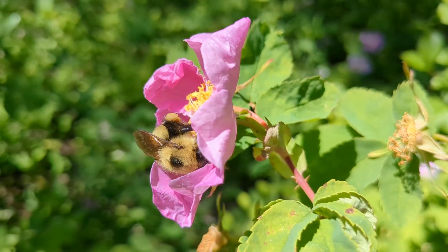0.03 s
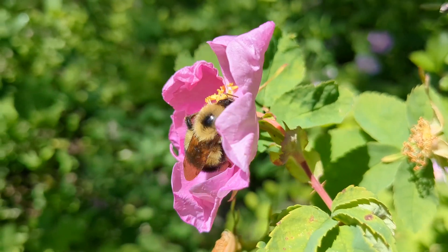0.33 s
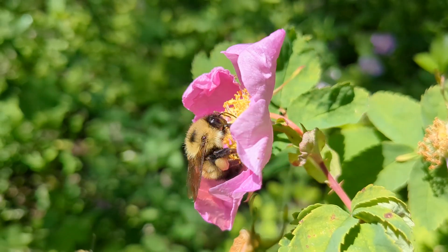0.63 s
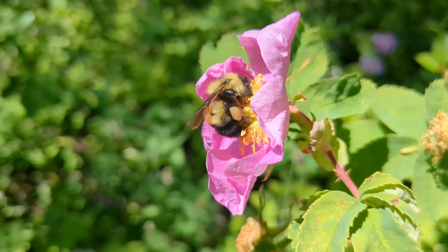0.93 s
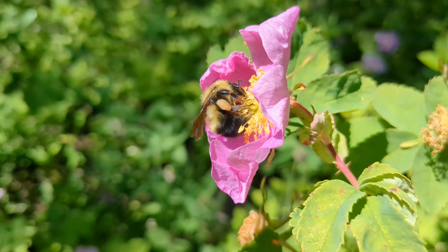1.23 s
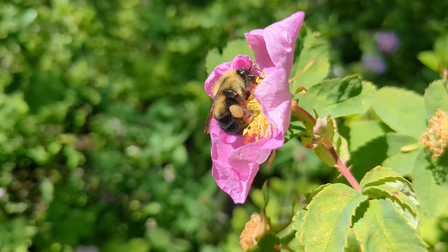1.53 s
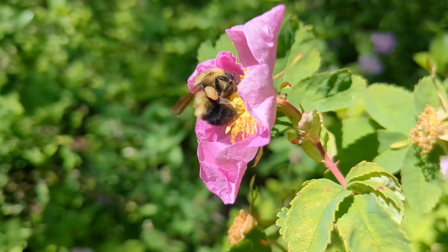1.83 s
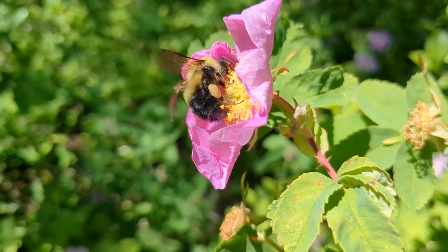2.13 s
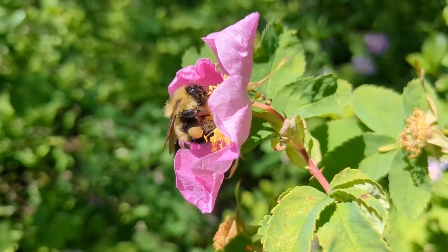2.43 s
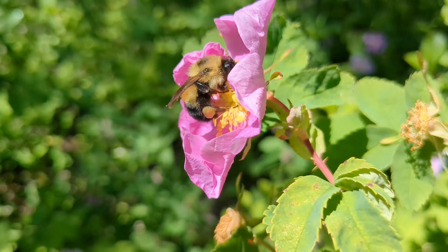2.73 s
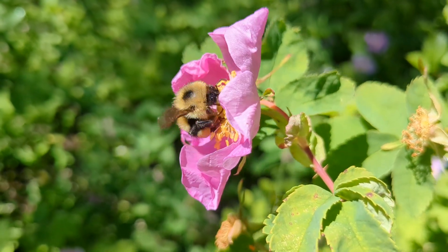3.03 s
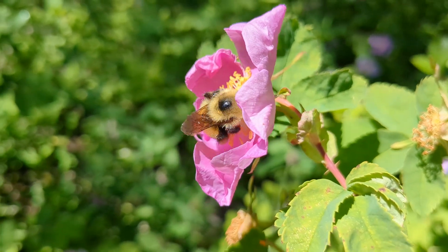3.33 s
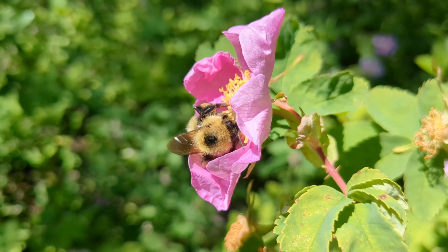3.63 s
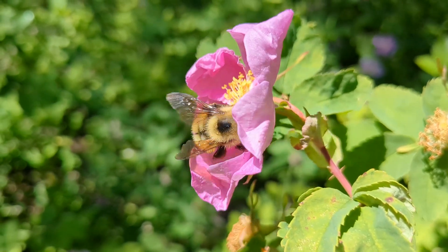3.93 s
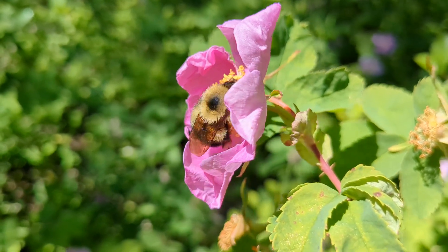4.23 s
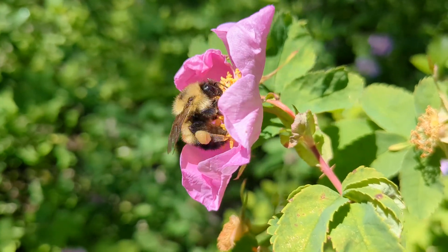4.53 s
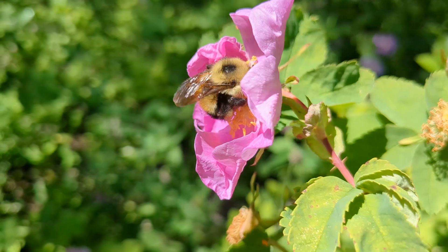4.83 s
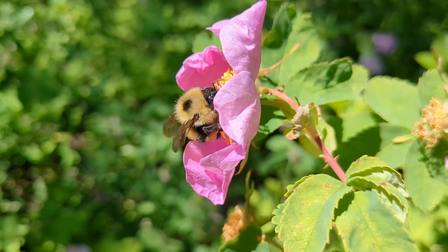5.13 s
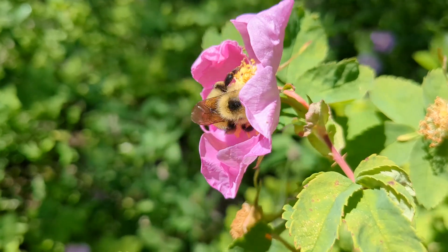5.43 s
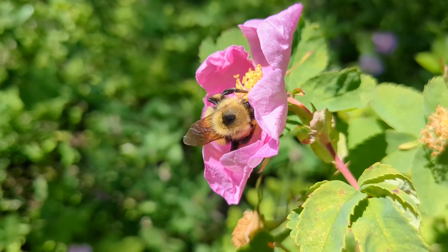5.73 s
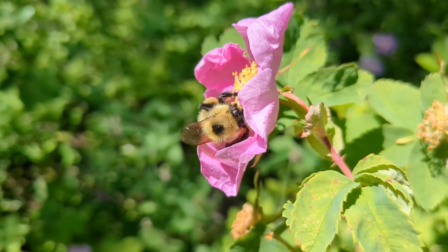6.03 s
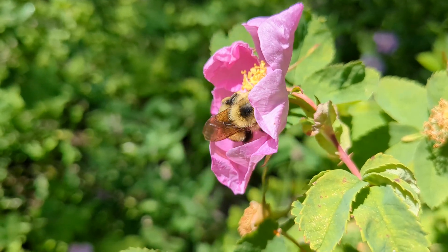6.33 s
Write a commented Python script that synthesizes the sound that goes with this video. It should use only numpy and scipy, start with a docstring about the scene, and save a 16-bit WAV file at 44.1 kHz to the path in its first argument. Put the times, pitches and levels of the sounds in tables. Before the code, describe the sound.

Close to the microphone, a bumblebee shakes pollen from a flower in repeated bursts of thin, sizzling buzz, the pitch jumping up and sagging. Its wings and legs flick the petals with tiny ticks and now and then a brief lower whirr. During the first half a smaller bee hovers from left to right and another hums farther off. Then the bumblebee carries on over faint garden air.

```python
"""A close, sizzling buzz comes first, in bursts: a bumblebee shakes pollen from a wild rose, its thorax
driving stamens and petals into forced vibration, one stroke a cycle. A second, smaller bee hovers from
left to right for three seconds and a third hums farther off in the quiet garden; both radiate harmonics
of their wingbeats. Wings and legs flick and tap the petals, and now and then the bumblebee's wings open
and whirr lower."""
import sys
import numpy as np
from scipy import signal
from scipy.fft import rfft, irfft, next_fast_len
from scipy.io import wavfile
from scipy.ndimage import uniform_filter1d, map_coordinates

SR = 44100
rng = np.random.default_rng(int(sys.argv[2]) if len(sys.argv) > 2 else 0)


def generate_wav(sig):
    """Save sig (samples, or channels by samples) to the path in sys.argv[1] as 16-bit PCM at SR."""
    pcm = np.round(np.clip(np.atleast_2d(sig).T, -1, 1) * 32767).astype(np.int16)
    wavfile.write(sys.argv[1], SR, pcm)


N = 280917
TIME = np.arange(N) / SR

# Bursts of shaking: start t/s, end t/s, rise/s, fall/s, then relative level/dB of
# sizzle, rasp, drone, upper stamen modes, petal rim modes, petal blade modes
SHAKE_BURSTS = [(-.05, 0.151, .03, 0.16, -47, -53, -56, 6, -3, -18),
                (0.094, 0.202, 0.068, 0.028, -32, -46, -43, 11, -8, -19),
                (.17, 0.517, .03, 0.25, -49, -57, -54.5, 7, -2, -16),
                (.41, 0.757, 0.09, .18, -41.5, -50.5, -44, 4.5, -3.5, -19),
                (0.675, 0.889, 0.039, 0.095, -37.5, -48.5, -33, 6.5, -6, -2),
                (0.849, 1.44, 0.14, 0.16, -43, -48.5, -51.5, -1, -11, -2),
                (1.427, 1.523, 0.025, 0.06, -59, -59, -44.5, 3, -3, -4),
                (1.659, 2.162, 0.12, 0.15, -40.5, -48, -49.5, 2, -11, -2.5),
                (2.088, 2.229, 0.043, 0.1, -35.5, -47.5, -50, 10, -7, -10),
                (2.197, 2.35, 0.03, 0.031, -51.5, -53.5, -49, 4, -6, -15),
                (2.338, 2.597, 0.019, 0.11, -42, -49, -51.5, 6, -6, -4),
                (2.756, 3.159, 0.16, 0.14, -39, -47.5, -50.5, 9, -14, -11),
                (3.385, 3.784, 0.039, 0.054, -34, -48.5, -50.5, 10, -6.5, 4.5),
                (3.679, 3.768, 0.024, .06, -30, -48, -66, 9, -5, -1.5),
                (3.749, 3.948, 0.023, 0.13, -39, -50.5, -56, 8, -8, -19),
                (3.912, 4.019, .06, 0.031, -40.5, -55, -75, 13, -15, -12),
                (4.065, 4.265, 0.013, 0.19, -48, -61, -82, 3, -9, 4),
                (4.211, 4.669, 0.18, 0.18, -37.5, -50.5, -54.5, 11.5, -1, -9),
                (4.758, 5.195, 0.1, 0.052, -35.5, -49.5, -51, 16.5, -8, 0.5),
                (5.21, 5.279, 0.0093, .06, -47.5, -77, -85, 8, -8, -16),
                (5.36, 5.491, .06, 0.042, -47, -60, -66, 3.5, -9, 3),
                (5.493, 6.196, 0.053, .14, -32.5, -49, -49, 9, -4.5, 1)]
# Spectrum of the air pushed by wings: f/Hz, relative level/dB
DRAUGHT_SPECTRUM = [(25, -14.5), (70, 0.5), (130, 1), (300, -5), (700, 0), (2000, -26), (15800, -100)]


def amp(db):
    """Amplitude ratio of a level: a factor of ten for every 20 dB."""
    return 10 ** (np.asarray(db) / 20)


def unit(x):
    """Normalisation to an rms of 1."""
    return x / np.sqrt(np.mean(x ** 2) + 1e-20)


def curves(rows):
    """Linear interpolation: one value per sample for each column after the time."""
    times, *columns = np.transpose(rows)
    return [np.interp(TIME, times, column) for column in columns]


def wobble(rate):
    """Slow random modulation: a spline through `rate` Gaussian knots a second."""
    return map_coordinates(rng.standard_normal(int(N * rate / SR) + 4), [TIME * rate])


def filtered(x, response):
    """Linear filtering: the spectrum of x times a complex frequency response."""
    size = next_fast_len(N + 8192)
    return irfft(rfft(x, size) * response(np.fft.rfftfreq(size, 1 / SR)), size)[..., :N]


def coloured(x, spectrum):
    """Spectral shaping by (f/Hz, level/dB) points on a logarithmic frequency axis."""
    hz, db = np.transpose(spectrum)
    return filtered(x, lambda f: amp(np.interp(np.log(f + 1), np.log(hz), db)))


def ringing(x, modes):
    """Resonance: each mode (f/Hz, width/Hz, level/dB) is a band-pass, squared for steep sides."""
    def band_pass(f, hz, width):
        return 1j * f * width / (hz * hz - f * f + 1j * f * width)
    return filtered(x, lambda f: sum(amp(db) * band_pass(f, hz, width) ** 2 for hz, width, db in modes))


def shifting(x, modes, drift_db):
    """Varying modal coupling: each resonance swells and fades as the bee changes its footing."""
    return unit(sum(amp(db + drift_db * wobble(9)) * unit(ringing(x, [(hz, width, 0)]))
                    for hz, width, db in modes))


def placed(x, balance_db, lead_ms):
    """Localisation by level and time difference: positive values make the left louder and earlier."""
    half = np.array([[.5], [-.5]])
    pair = filtered(x, lambda f: np.exp(2j * np.pi * f * half * lead_ms / 1000))
    gain = amp(half * balance_db)
    return pair * gain / np.sqrt(np.mean(gain ** 2, axis=0))


def impulses(seconds, sizes):
    """Band-limited impulses: windowed sinc pulses, which can fall between samples."""
    at = np.asarray(seconds)[:, None] * SR
    index = np.floor(at).astype(int) + np.arange(-7, 9)
    shape = np.sinc(index - at) * np.cos(np.pi * (index - at) / 16) ** 2
    pulses = np.asarray(sizes)[:, None] * shape
    return np.bincount(np.clip(index, 0, N).ravel(), pulses.ravel(), N + 1)[:N]


def gate(start, end, rise, fall):
    """Trapezoidal envelope: attack, hold and release, between 0 and 1."""
    return np.clip(np.minimum((TIME - start) / rise, (end - TIME) / fall), 0, 1)


def slips(per_second=18, decay_s=.031):
    """Stick-slip of the feet: random jumps that die away, with mean near 0 and rms 1."""
    count = round(per_second * N / SR)
    offset, size = rng.random((count, 2)).T
    jolts = impulses((np.arange(count) + offset) / count * N / SR, size)
    level = signal.lfilter([1], [1, -np.exp(-1 / (decay_s * SR))], jolts)
    return unit(np.tanh(unit(level - level.mean())))


def shaking_levels():
    """Addition of powers: level/dB of sizzle, rasp and drone, as bursts over restless idle scraping."""
    idle_sizzle_db, idle_rasp_db, fidget_db = -63.5, -70, 6.5
    swell_db_per_s, ruffle_db = 8.5, .95
    slip = slips()
    sizzle = amp(idle_sizzle_db + fidget_db * slip) ** 2
    rasp = amp(idle_rasp_db + fidget_db * slip / 2) ** 2
    drone = 1e-12
    for start, end, rise, fall, sizzle_db, rasp_db, drone_db, *_ in SHAKE_BURSTS:
        effort = gate(start, end, rise, fall)
        swell_db = swell_db_per_s * (np.clip(TIME, start, end) - (start + end) / 2)
        bloom_motion = gate(start, end, 2.66 * rise, fall=.099)  # slow to get going, early to let go
        sizzle += (effort * amp(sizzle_db + swell_db)) ** 2
        rasp += (effort * amp(rasp_db)) ** 2
        drone += (effort * bloom_motion * amp(drone_db)) ** 2
    return 10 * np.log10([sizzle, rasp, drone]) + ruffle_db * slip


def thorax_beat():
    """Exponential relaxation: the buzz jumps to each listed pitch, then its f/Hz sags toward rest."""
    # Pitch jumps, up at a twitch of the flight muscle and down when the wings open: t/s, f/Hz
    jumps = [(0, 205.4), (0.171, 239.2), (0.342, 233), (.49, 278.5), (.61, 258.6), (.72, 156.1),
             (.79, 146.4), (.95, 250), (1.1, 248.9), (1.2, 255.5), (1.34, 284.6), (1.71, 265.3),
             (1.84, 246.1), (1.99, 240.8), (2.13, 145.3), (2.36, 306.3), (2.86, 252.5), (2.97, 245.9),
             (3.07, 258), (3.42, 276.5), (3.63, 230.2), (3.735, 149), (3.83, 149.8), (4.279, 209.2),
             (4.39, 248.6), (4.459, 241), (4.559, 246.6), (4.81, 255.6), (4.89, 238.1), (5.015, 237.2),
             (5.155, 244.5), (5.53, 235), (5.624, 223), (5.69, 227), (5.785, 224), (5.875, 226.5),
             (5.99, 213.8), (6.15, 185.4)]
    jump_s, sag_s, rest_hz = .03, .22, 127.5
    times, jump_hz = np.transpose(jumps)
    last = np.maximum(np.searchsorted(times, TIME + jump_s / 2) - 1, 0)
    beat_hz = rest_hz + (jump_hz[last] - rest_hz) * np.exp((times[last] - TIME) / sag_s)
    return uniform_filter1d(beat_hz, round(jump_s * SR))


def contacts(strokes, width_ms, scatter_db, jitter_ms, bounce, rub):
    """Rattling contact force: a short scrape per stroke, loose bounces around it, rubbing between."""
    bounces, bounce_spread_s = 3, .00244
    chance = rng.standard_normal((len(strokes), 2 + 2 * bounces))
    # a stroke can miss by much, but cannot hit much harder than the muscle allows
    size = amp(scatter_db * np.minimum(chance, 1))
    hits = impulses(strokes + jitter_ms * chance[:, 0] / 1000, size[:, 1] ** 2)
    for k in range(2, 2 + 2 * bounces, 2):
        hits += impulses(strokes + bounce_spread_s * chance[:, k], (bounce * size[:, k + 1]) ** 2)
    lag_ms = np.arange(-128, 129) / SR * 1000
    shape = np.exp(-np.abs(lag_ms) / np.where(lag_ms < 0, width_ms / 2, width_ms))
    power = np.abs(signal.fftconvolve(hits, shape, 'same'))
    return np.sqrt(power / power.mean() + rub ** 2)


def stamen_sizzle(strokes, scatter_db, level_db, upper_db):
    """Impact excitation: gritty contacts ring the high modes of the stamens."""
    # Lower and upper stamen modes: f/Hz, width/Hz, relative level/dB
    lower_modes = [(9500, 1030, 0)]
    upper_modes = [(11285, 1180, -8), (11824, 1070, -5.5)]
    force = contacts(strokes, width_ms=.34, scatter_db=scatter_db, jitter_ms=.12, bounce=.4, rub=.27)
    grit = force * rng.choice([-1, 1], N)
    upper = amp(upper_db)
    # neighbouring modes swing in opposite senses, which fills the valley between them
    stamens = unit(ringing(grit, lower_modes)) - upper * unit(ringing(grit, upper_modes))
    stamens /= np.sqrt(1 + upper ** 2)
    return placed(amp(level_db + 1) * stamens, balance_db=24, lead_ms=.035)


def petal_rasp(strokes, scatter_db, level_db):
    """Friction noise: the soft petals smear the scrapes and send a different share to each side."""
    # Spectrum of scraped petals: f/Hz, relative level/dB
    spectrum = [(30, -22), (90, -13), (400, -14.5), (680, -16.5), (1100, -9), (1900, -0.5), (2650, -3.5),
                (3100, 1.5), (4200, 0), (5200, 1.5), (7000, 0), (8500, -0.5), (12000, -1.5), (15800, -5.5)]
    force = contacts(strokes, width_ms=.6, scatter_db=scatter_db, jitter_ms=.18, bounce=.5, rub=.7)
    scrape = force * (rng.standard_normal(N) + 1.97 * rng.standard_normal((2, N)))
    return placed(amp(level_db + 6) * unit(coloured(scrape, spectrum)), balance_db=1, lead_ms=.2)


def petal_twang(push, level_db, rim_db, blade_db):
    """Periodic excitation: cleanly repeated pushes ring the rim and blade of the petals."""
    # Petal modes: f/Hz, width/Hz, relative level/dB
    rim_modes = [(2106, 440, -2), (3375, 470, 4)]
    blade_modes = [(4960, 460, -0.041), (5361, 670, -0.4), (5945, 500, -1.5)]
    rim = amp(rim_db) * shifting(push, rim_modes, drift_db=.5)
    blade = amp(blade_db) * shifting(push, blade_modes, drift_db=5)
    return placed(amp(level_db - 4.5) * (rim + blade), balance_db=-9.5, lead_ms=.025)


def bloom_drone(push, level_db, beat_hz):
    """Radiation from a small body: the whole bloom drones, too small to give off its lowest harmonics."""
    # Radiation efficiency: f/Hz, relative level/dB
    radiation = [(500, -53), (740, -14), (860, -7), (15800, -6)]
    # Modes of the whole bloom: f/Hz, width/Hz, relative level/dB
    modes = [(1066, 830, 6.5), (1077, 584, -3.5), (1240, 580, -2.5), (2060, 620, -0.5)]
    firm_hz, slack_db_per_hz = 225.3, .25  # below a firm beat the push weakens
    slack_db = slack_db_per_hz * np.maximum(firm_hz - beat_hz, 0)
    bloom = shifting(coloured(push, radiation), modes, drift_db=1.2)
    return placed(amp(level_db - slack_db) * bloom, balance_db=5, lead_ms=.16)


def sonication():
    """Forced vibration: each thorax stroke rattles the stamens, scrapes petals and pushes the bloom."""
    sizzle_db, rasp_db, drone_db = shaking_levels()
    # the mode levels glide from the middle of one burst to the next
    mode_levels = [((start + end) / 2, *rest[-3:]) for start, end, *rest in SHAKE_BURSTS]
    upper_db, rim_db, blade_db = curves(mode_levels)
    beat_hz = thorax_beat()
    cycles = np.cumsum(beat_hz * (1 + .008 * wobble(60))) / SR
    strokes = np.interp(np.arange(1, int(cycles[-1])), cycles, TIME)  # t/s of each whole cycle
    # a loose grip rattles unevenly, a firm one evenly
    grip_db = np.interp(strokes, TIME, sizzle_db)
    scatter_db = np.interp(grip_db, [-52, -38], [3.2, 1.4])[:, None]
    sizzle = stamen_sizzle(strokes, scatter_db, sizzle_db, upper_db)
    rasp = petal_rasp(strokes, scatter_db, rasp_db)
    jitter_s = rng.normal(0, .000025, len(strokes))
    push = impulses(strokes + jitter_s, amp(rng.normal(0, 1.5, len(strokes))))
    twang = petal_twang(push, rasp_db, rim_db, blade_db)
    return sizzle + rasp + twang + bloom_drone(push, drone_db, beat_hz)


def wing_tone(cycles, harmonics, flutter_db, rough, bright_db=0):
    """Harmonic series of a wingbeat: upper orders flutter as wings turn, and eddies roughen them most."""
    orders, db = np.transpose(harmonics)
    tone = np.zeros(N)
    for k in range(1, round(orders[-1]) + 1):
        level_db = np.interp(k, orders, db) + (k > 2) * (bright_db + flutter_db * wobble(21.97))
        depth = rough * (1 + (k / 3) ** 2)
        eddies = depth * (wobble(110) + 1j * wobble(110))
        carrier = np.exp(2j * np.pi * (k * cycles + rng.random()))
        tone += amp(level_db) * np.real((1 + eddies) * carrier) / np.sqrt(1 + 2 * depth ** 2)
    return tone


def hovering_bee():
    """A moving source in the near field: a hum led by its second harmonic, with a brush of draught."""
    # Hum at twice the wingbeat: t/s, relative level/dB, f/Hz
    hum = [(0.0, -53.5, 436), (0.04, -60.5, 454.5), (0.12, -50, 464.7), (0.18, -61.5, 438.7),
           (0.21, -53, 454.7), (0.3, -48.5, 481), (0.39, -47.5, 468.5), (0.64, -43, 474),
           (0.74, -51.5, 461), (0.88, -50.5, 476.3), (0.92, -56.5, 476.7), (1.17, -59.5, 443.2),
           (1.22, -54, 493.0), (1.25, -64, 480.9), (1.29, -51.5, 473.5), (1.41, -52, 462.5),
           (1.48, -71, 432.6), (1.57, -54, 445), (1.63, -98, 433.3), (1.65, -62.5, 449.9),
           (2.11, -54.5, 437.2), (2.17, -53.5, 486), (2.24, -64, 482.5), (2.31, -52, 483.7),
           (2.35, -55, 480), (2.42, -54, 446), (2.53, -52.5, 484.5), (2.67, -71, 442.4), (2.7, -57, 473),
           (3.04, -53, 475.3), (3.18, -92, 435.7), (3.3, -99, 432.7)]
    # Flight path: t/s, left minus right level/dB, wing-edge brightness/dB
    flight = [(0, 7, 7), (.3, 5, 5.5), (.63, 13.5, 1), (.9, 1, 10), (1.1, 4, 13.5), (1.4, 3, 8),
              (1.7, 2, 7.5), (2.1, -3.5, 10.5), (2.7, -8, 6), (3.2, -9, 10.5)]
    # Wing spectrum: harmonic number, relative level/dB
    harmonics = [(1, -14), (2, 0), (3, -24.5), (4, -18.5), (5, -18.5), (6, -18), (7, -17), (8, -20),
                 (11, -20.5), (16, -51)]
    db, hum_hz = curves(hum)
    side_db, bright_db = curves(flight)
    sway = wobble(22)  # each correction of its course lifts pitch and level together
    beat_hz = hum_hz / 2 * (1 + .00898 * sway)
    cycles = np.cumsum(beat_hz * (1 + .005 * wobble(45))) / SR
    tone = wing_tone(cycles, harmonics, flutter_db=2.6, rough=.13, bright_db=bright_db)
    tone *= amp(db + 3.5 + 1.2 * sway)
    # close up, the bare wingbeat grows twice as fast in dB as the hum
    tone += amp(40.5 + 2 * db) * np.sin(2 * np.pi * cycles)
    gust_db = 2.5 * wobble(8)
    draught = amp(.5 * db - 36 + gust_db) * unit(coloured(rng.standard_normal((2, N)), DRAUGHT_SPECTRUM))
    return placed(tone, balance_db=side_db, lead_ms=.16) + draught


def far_bee():
    """Interference: a slightly lower hum from the next flowers beats against the hovering bee."""
    # Distant wingbeat: t/s, f/Hz, relative level/dB
    wingbeat = [(0, 217, -56.5), (.8, 218, -57.5), (1.17, 219, -53), (1.5, 210, -64.5), (1.9, 228.7, -52),
                (2.13, 226, -58), (2.8, 220, -64.5), (3.1, 216, -69), (3.3, 212, -92), (5.2, 210, -97),
                (5.8, 202, -70), (6.37, 204, -83)]
    # Wing spectrum: harmonic number, relative level/dB
    harmonics = [(1, -16), (2, 0), (3, -30), (5, -10)]
    beat_hz, db = curves(wingbeat)
    cycles = np.cumsum(beat_hz * (1 + .0141 * wobble(25))) / SR
    tone = wing_tone(cycles, harmonics, flutter_db=2.5, rough=.88)
    return placed(amp(db + 1.5) * tone, balance_db=-1.5, lead_ms=.19)


def garden_air():
    """A diffuse field: faint outdoor noise, nearly uncorrelated between the sides, drifting in level."""
    # Ambient spectrum: f/Hz, relative level/dB
    spectrum = [(25, -15), (70, 1.5), (150, -5.5), (280, -14), (420, -10), (700, -15), (1200, -1),
                (3500, 4), (7000, 5.5), (11000, 5.5), (15800, -8)]
    air = rng.standard_normal((2, N)) + .25 * rng.standard_normal(N)
    return amp(-61.5 + 1.5 * wobble(2.237)) * unit(coloured(air, spectrum))


def flicks():
    """Transient excitation: one short scrape rings a bright tick in stamens, a duller one in a petal."""
    # Flicks of wings and legs: t/s, scrape level/dB, petal's share relative to it/dB
    events = [(.1496, -26, -35), (.1758, -12, -46), (.7133, -14, -11.5), (.719, -17, -13),
              (0.7258, -12, -18), (0.768, -15.5, -23), (0.7745, -14, -12.5), (.82, -23, -22),
              (0.8282, -24, -10), (2.1166, -24, -27), (3.7339, -18, -28), (3.8559, -26, -20),
              (3.927, -30, -29), (3.9821, -30, -34), (4.078, -30, -37), (5.217, -36, -29)]
    bright, dull = np.zeros((2, N))
    t, decay_s = TIME[:400], .0008
    for start, db, petal_db in events:
        scrape = rng.choice([-1, 1], len(t)) * np.exp(-t / decay_s)
        bright[round(start * SR):][:len(t)] += amp(db) * scrape
        dull[round(start * SR):][:len(t)] += amp(db + petal_db) * scrape
    tick = ringing(bright, [(11200, 4500, 3)])
    petal = ringing(dull, [(3387, 560, 6.1), (5160, 2700, 10.8)])
    return placed(tick, balance_db=11, lead_ms=.0091) + placed(petal, balance_db=-3, lead_ms=.16)


def open_wings():
    """Aerodynamic sound: a rough, low whirr and a puff as the bumblebee spreads its wings for balance."""
    # Wing openings: peak t/s, rise/s, level/dB
    flaps = [(.76, 0.054, -46.5), (.84, 0.01, -48.5), (2.141, 0.018, -53.5), (3.742, 0.037, -43),
             (3.83, 0.029, -56.5)]
    # Wing spectrum: harmonic number, relative level/dB
    harmonics = [(1, 2), (2, 1), (3, -3), (4, -2), (5, -5.5), (7, -9.5), (12, 2.5)]
    fold_db_per_s = 248  # the whirr dies as they close
    spread = np.zeros(N)
    for peak, rise, db in flaps:
        opening = np.clip((TIME - peak) / rise + 1, 0, 1) ** 2
        spread += opening * amp(db - fold_db_per_s * np.maximum(TIME - peak, 0))
    whirr = wing_tone(np.cumsum(thorax_beat()) / SR, harmonics, flutter_db=2.5, rough=.2)
    puff = amp(-15) * unit(coloured(rng.standard_normal((2, N)), DRAUGHT_SPECTRUM))
    return spread * (placed(unit(whirr), balance_db=5.5, lead_ms=.26) + puff)


def leg_taps():
    """Damped free vibration: a tapped petal rings briefly, with a weaker low mode and a dry scratch."""
    # Legs on the rim of the flower: t/s, relative level/dB, f/Hz
    taps = [(1.885, -34.5, 3690), (2.577, -45.5, 2410), (3.2, -41.5, 3384)]
    out = np.zeros(N)
    t, t60_s = TIME[:1200], .011
    for start, db, hz in taps:
        ring = np.sin(2 * np.pi * hz * t) + .34 * np.sin(2 * np.pi * .63 * hz * t)
        scratch = .25 * rng.standard_normal(len(t))
        out[round(start * SR):][:len(t)] += amp(db + 2 - 60 * t / t60_s) * (ring + scratch)
    return placed(out, balance_db=-4, lead_ms=.021)


def scene():
    """Superposition: the bumblebee at the flower, the two other bees and the garden air."""
    bumblebee = sonication() + open_wings() + flicks() + leg_taps()
    return bumblebee + hovering_bee() + far_bee() + garden_air()


def record(dry):
    """Band limiting: an ideal low-pass removes the highest treble."""
    cutoff_hz = 15830
    return filtered(dry, lambda f: f < cutoff_hz)


dry = scene()
out = record(dry)
generate_wav(out)
```